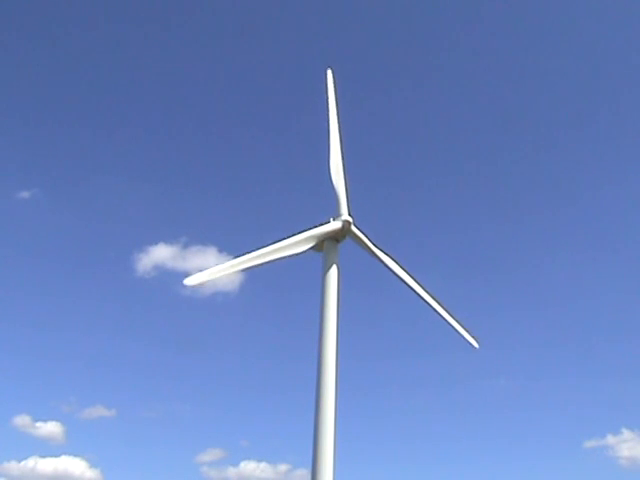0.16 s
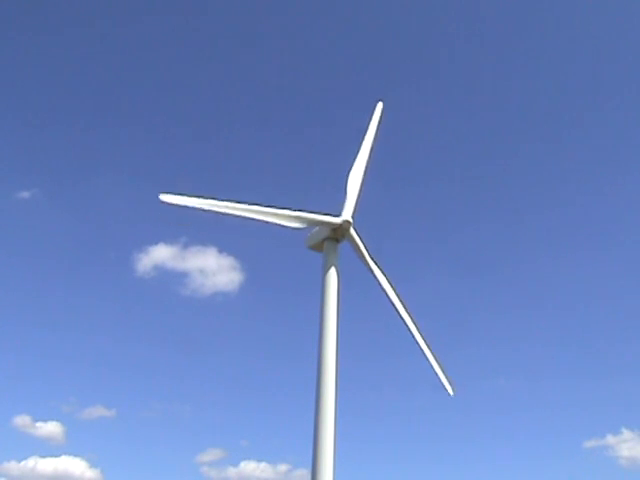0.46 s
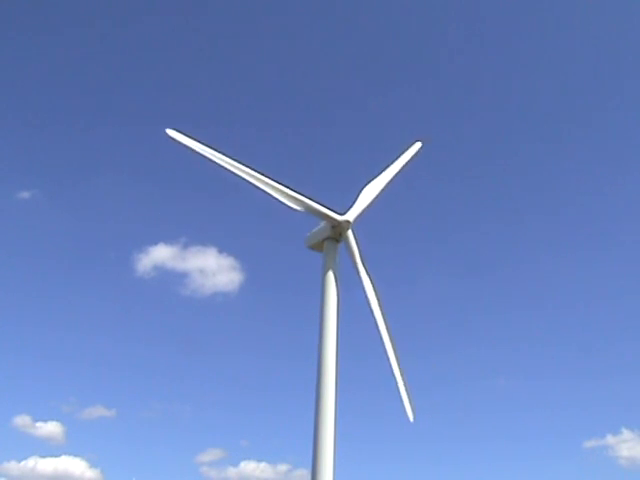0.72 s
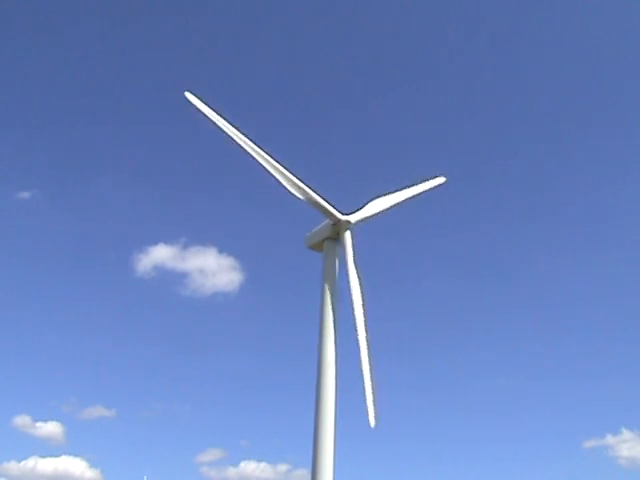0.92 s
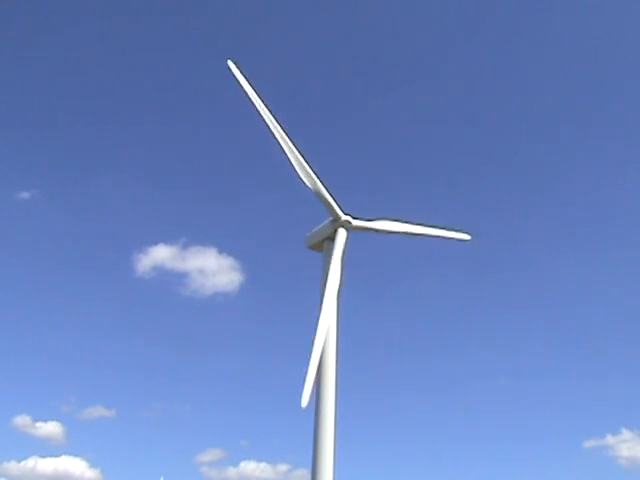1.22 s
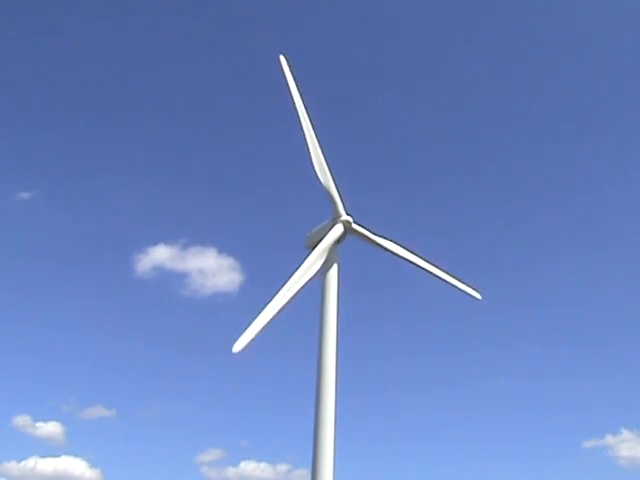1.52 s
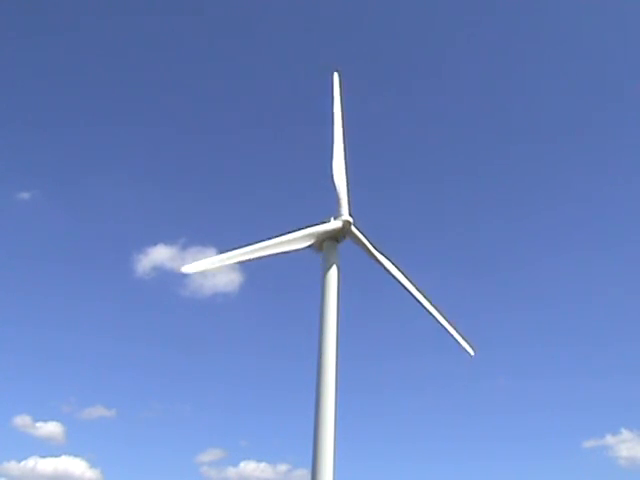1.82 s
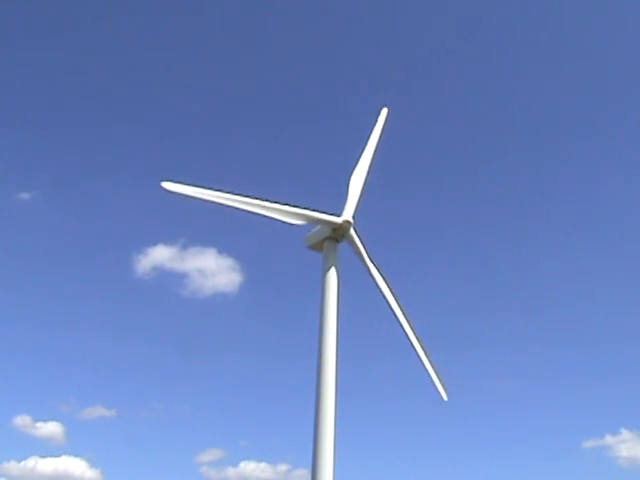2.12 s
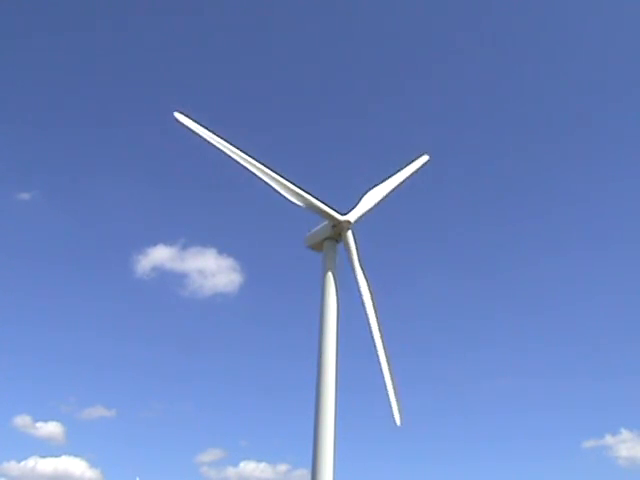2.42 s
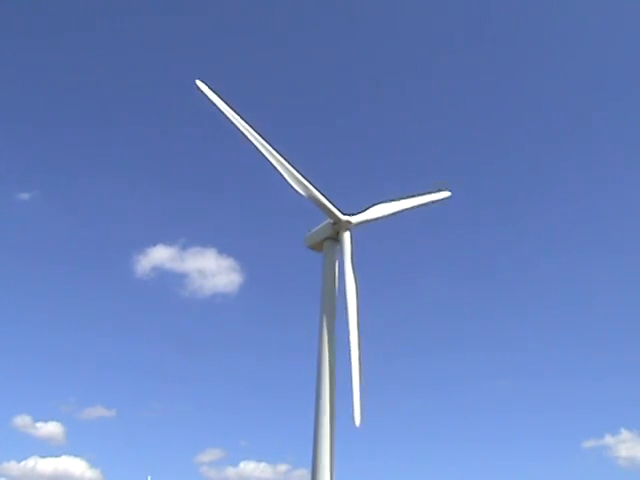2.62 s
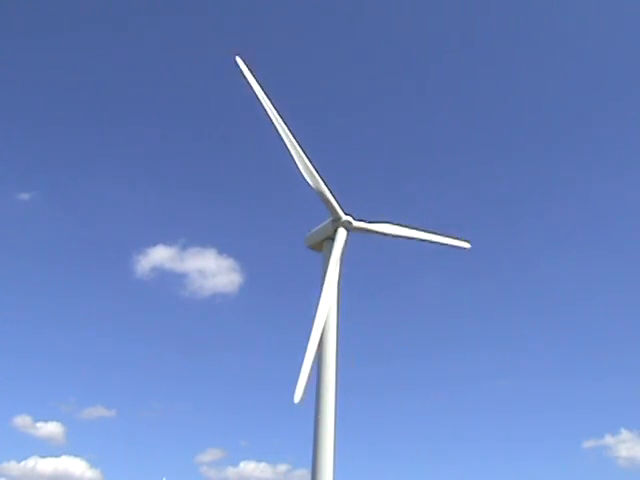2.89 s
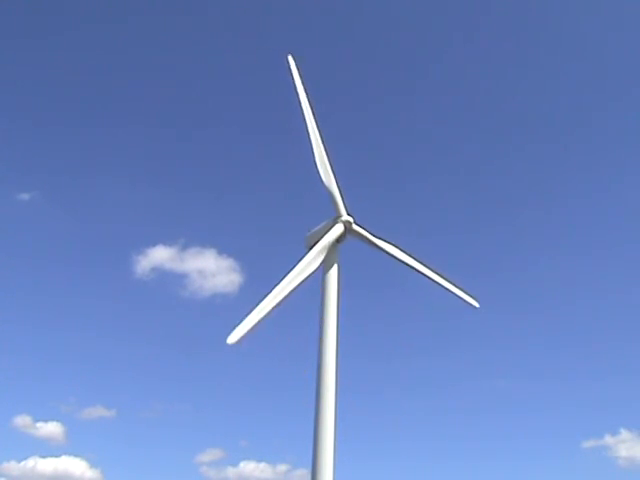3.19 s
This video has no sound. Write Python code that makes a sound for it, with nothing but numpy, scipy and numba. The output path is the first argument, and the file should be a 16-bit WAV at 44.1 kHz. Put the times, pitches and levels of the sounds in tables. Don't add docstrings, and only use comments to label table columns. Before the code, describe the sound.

Gusty low wind noise batters an open-air microphone, with sharp pops and distant birdsong.

```python
import sys
import numpy as np
from scipy import signal
from scipy.fft import rfft, irfft
from scipy.io import wavfile
from scipy.ndimage import uniform_filter1d
from numba import njit

SR = 44100
rng = np.random.default_rng(int(sys.argv[2]) if len(sys.argv) > 2 else 0)


def attenuation_scalar(level_db):
    decades = np.asarray(level_db, float) / 20
    return 10 ** decades


def unload_wav(signal):
    wavfile.write(
        sys.argv[1],
        SR,
        np.round(np.clip(np.atleast_2d(signal).T, -1, 1) * 32767).astype(np.int16),
    )


N = 147735
t = np.arange(N) / SR

# t/s, wind level/dB, turbulence/dB, cross-flow level/dB
GUSTS = [(0, -30, -16.5, 1.5), (.2, -36.5, -15, 2.5), (.7, -31, -16, 8), (.85, -32, -21.5, 8.5),
         (1.121, -37.5, -13, 4), (1.301, -27, -22, 5), (1.549, -26.5, -23, 6), (1.699, -30, -24, 6),
         (2.03, -28, -16, 6.5), (2.15, -25.5, -24, 6.5), (2.329, -30.5, -17.5, 1), (2.45, -26.5, -26, 4.5),
         (2.62, -34.5, -20, 10.5), (2.791, -22, -31.5, -4), (2.839, -18.5, -22.5, 12.5),
         (2.969, -29, -15, 1.5), (3.059, -26.5, -19, 4), (3.201, -27, -19.5, 5)]
# t/s, swell/dB, added turbulence/dB, length/s
WIND_PUFFS = [(0.146, -4.5, 10.5, 0.042), (0.477, 1, 2, 0.011), (0.57, -1, 6, .008), (0.698, 0.5, 6, .015),
              (0.898, 1, 6, .006), (1.057, -3, 11, 0.012), (1.12, -3, 2, 0.015), (1.301, 4, -3, .008),
              (1.405, 3, 5, 0.014), (1.526, 4.5, 1.5, 0.0067), (2.02, -3, 7, 0.029),
              (2.085, -3.5, 3, 0.017), (2.257, 0, 7, 0.019), (2.356, 4, 7, 0.029),
              (2.554, -1.5, 5.5, 0.0065), (2.616, -7, -2, 0.016), (2.672, 6.5, 0, 0.0083),
              (2.689, -6, 2, .008), (2.743, -6.5, 7, .015), (2.822, 2.5, 10, 0.0058),
              (2.96, -0.5, 9, 0.042), (3.044, 3, -6.5, 0.012), (3.148, -1.5, 10, .016),
              (3.192, -1.5, -8, 0.0063), (3.222, -2.5, 11, .005), (3.252, -4.5, 1, 0.016),
              (3.305, -0.5, 3, .008), (0.811, 2, 4, 0.0091), (1.921, 2, 3.5, 0.011), (2.311, .5, 5, 0.014),
              (2.462, 5, 1.5, 0.0093), (0.085, 2.5, -3.5, 0.019), (2.882, 0.5, 3.5, 0.0045)]
# t/s, pressure (+ is right, - is left), mono hold/s
EDDY_SLAPS = [(.3317, .62, .035), (.477, .35, .012), (1.2235, -.33, .025), (1.2931, -.42, .02),
              (1.5279, .5, .002), (1.6103, -.4, .03), (1.8194, .38, .025), (1.8688, -.52, .024),
              (2.1205, -.47, .022), (2.4499, -.44, .006), (2.6689, .3, .024), (2.7177, .8, .1),
              (2.826, -.66, .007), (3.025, -.5, .03), (3.0959, -.5, .016), (3.1694, .72, .041)]
# f/Hz, level/dB (per Hz)
RUMBLE_SPECTRUM = [(12, -31), (20, -6), (76, 1.5), (222, -4.5), (519, -22), (720, -29.5), (2000, -49),
                   (2600, -48.5), (4400, -120)]
# f/Hz, level/dB (per Hz)
CROSS_SPECTRUM = [(12, -28), (30, 10), (60, 10), (130, 9), (210, 5), (464, -9.5), (3000, -53), (5000, -60)]
# t/s, length/s, start f/Hz, end f/Hz, level/dB
LARK_NOTES = [(0, .02, 4100, 4100, -59), (.018, .035, 4100, 2500, -62), (.398, .022, 2750, 3000, -59),
              (.43, .025, 4000, 3450, -60), (.512, .018, 4200, 4100, -58), (.528, .025, 4100, 3100, -60),
              (.615, .045, 4300, 2600, -61), (.718, .012, 3600, 4200, -60), (.728, .03, 3900, 2600, -61),
              (.792, .05, 4650, 4950, -64), (.84, .025, 4900, 4200, -71), (1.135, .025, 3600, 2600, -61),
              (1.2, .016, 3500, 3600, -59), (1.79, .03, 4100, 3500, -61), (1.855, .035, 3800, 3200, -61),
              (1.9, .034, 4250, 4750, -57), (1.932, .04, 4300, 2700, -58), (1.957, .012, 3850, 4050, -60),
              (1.968, .022, 4000, 3200, -60), (2.055, .04, 4300, 3700, -64), (2.075, .022, 3800, 3100, -62),
              (2.172, .02, 3700, 3300, -60), (2.195, .022, 4100, 3500, -62), (2.345, .03, 4750, 4700, -66),
              (0, .03, 2250, 2150, -55), (.152, .036, 2250, 2150, -56), (.48, .065, 2850, 2450, -64),
               (1.13, .057, 2200, 2800, -58), (1.187, .028, 2700, 2200, -60),
               (1.215, .053, 2400, 3000, -58), (1.287, .045, 2350, 2250, -59),
               (1.627, .052, 3000, 2450, -55), (1.678, .025, 2600, 3450, -60), (1.85, .03, 2000, 2300, -61),
               (1.878, .028, 2400, 3400, -60), (2.03, .055, 3900, 2650, -59),
               (2.255, .065, 2900, 3080, -55), (2.313, .05, 3080, 2850, -55),
               (2.356, .058, 2850, 2250, -57), (2.478, .025, 3000, 2900, -57), (2.5, .02, 2900, 2450, -56),
               (2.865, .17, 2850, 2700, -64), (3.06, .05, 4650, 5000, -63), (3.108, .025, 5000, 4100, -61),
               (3.18, .045, 5100, 3200, -64), (3.26, .045, 4200, 2700, -64), (3.328, .03, 4350, 4300, -59),
               (.905, .02, 3650, 3550, -60), (.03, .06, 4800, 4650, -68), (.755, .015, 5000, 4200, -65),
               (1.215, .025, 6200, 5300, -64), (1.345, .02, 5900, 5500, -66), (.995, .025, 3900, 3100, -62),
               (.94, .02, 4800, 4300, -64), (3.3, .015, 5200, 5000, -62)]
# t/s, level/dB, centre f/Hz, width/octaves
NEAR_CLICKS = [
    (.134, -35, 2400, .85),
    (.621, -43, 11000, 1.0),
    (.6684, -35, 10000, 1.2),
    (2.7181, -19, 800, 1.4),
]
# f/Hz, level/dB, wander/Hz
GEAR_MESH = [
    (512, -57, 9),
    (1024, -66.5, 8),
]
# f/Hz, level/dB (per Hz)
HISS_SPECTRUM = [(600, -20), (1000, 0), (2000, -6), (3500, -10), (5500, -14), (8800, -20), (11000, -18),
                 (15500, -22)]
# f/Hz, level/dB
CIRCUIT_LINES = [(4500, -88), (5265, -88), (5922, -88), (10158, -91), (11186, -90), (15735, -96)]


def unit(x):
    return x / np.sqrt(np.mean(x ** 2))


def colour(x, points):
    hz, db = np.array(points, float).T
    f = np.fft.rfftfreq(N, 1 / SR) + 1
    return irfft(rfft(x) * attenuation_scalar(np.interp(np.log(f), np.log(hz), db)), N)


def band(x, hz, octaves):
    f = np.fft.rfftfreq(N, 1 / SR) + 1
    return irfft(rfft(x) * np.exp(-(np.log2(f / hz) / octaves) ** 2), N)


def walk(rate_hz):
    z = np.interp(t * rate_hz, np.arange(400), rng.standard_normal(400))
    z = uniform_filter1d(z, int(SR / rate_hz))
    return unit(z - z.mean())


def gust(column):
    g = np.array(GUSTS)
    return np.interp(t, g[:, 0], g[:, column])


def puffs(column):
    return sum(p[column] * np.exp(-.5 * ((t - p[0]) / p[3]) ** 2) for p in WIND_PUFFS)


def eddy_grains():
    eddies_per_s, scatter_db, most_db = 160, 6, 11
    draw = rng.random((2000, 2))
    at = (np.cumsum(-np.log(draw[:, 0])) * SR / eddies_per_s).astype(int)
    size_db = np.minimum(-scatter_db * np.log(draw[:, 1]), most_db)
    size = attenuation_scalar(size_db) * np.sign(rng.standard_normal(2000))
    grains = np.zeros(N)
    inside = at < N
    grains[at[inside]] = size[inside]
    return unit(grains)


def flow(spectrum, spit_db, shared_db, own_db, grain):
    puff_hz, puff_octaves = 108, 2.1
    raw = colour(rng.standard_normal(N) + grain * eddy_grains(), spectrum)
    shared = walk(24.98)
    turbulence_db, puff_db = gust(column=2) + spit_db, puffs(column=2)
    out = np.zeros(N)
    for hz in 25 * 2. ** np.arange(8):
        top = np.clip(np.log2(hz / 90) / 3.86, 0, 1)
        lift = np.clip(np.log2(hz / puff_hz) / puff_octaves, -.4, 1)
        swell_db = shared_db * (.36 + top) * shared + own_db * walk(8.474)
        out += attenuation_scalar(swell_db + top * turbulence_db + lift * puff_db) * band(raw, hz, 1.0)
    return unit(out) * attenuation_scalar(gust(column=1) + puffs(column=1))


def rumble():
    return flow(RUMBLE_SPECTRUM, spit_db=19, shared_db=1.5, own_db=2.5, grain=.68)


def cross_flow():
    port_cut_hz, ceiling = 105, .4
    cross = flow(CROSS_SPECTRUM, spit_db=25.5, shared_db=-3, own_db=-4, grain=1.16)
    cross = cross * attenuation_scalar(-1 + gust(column=3))
    cross = signal.sosfilt(signal.butter(2, port_cut_hz, "high", fs=SR, output="sos"), cross)
    return ceiling * np.tanh(cross / ceiling)


def slaps():
    push_s, dip_s, dip_share = .0006, .003, .13
    fold_db, fold_s, unfold_s = -29.5, .0015, .00088
    push, fold = np.zeros(N), np.zeros(N)
    for at, size, hold in EDDY_SLAPS:
        u = t - at
        dip = np.exp(-((u + 1.76 * dip_s) / dip_s) ** 2)
        push += size * (np.exp(-.5 * (u / push_s) ** 2) - dip_share * dip)
        closing = np.minimum(u / fold_s, (hold - u) / unfold_s)
        fold = np.maximum(fold, np.clip(closing, 0, 1))
    return attenuation_scalar(-3) * push, attenuation_scalar(fold_db * fold)


def larks():
    soft_end_s, smear_s, smear_db = .005, .03, -8
    song, wobble_hz = np.zeros(N), 25 * walk(150)
    for start, length, hz0, hz1, db in LARK_NOTES:
        u = np.clip((t - start) / length, 0, 1)
        shape = np.clip(np.minimum(u, 1 - u) * length / soft_end_s, 0, 1)
        pitch_hz = hz0 + (hz1 - hz0) * u + wobble_hz
        song += attenuation_scalar(db) * shape * np.sin(2 * np.pi * np.cumsum(pitch_hz) / SR)
    song = np.sqrt(2) * song * attenuation_scalar(-4 + 2.3 * walk(90))
    scatter = rng.standard_normal(4000) * np.exp(-t[:4000] / smear_s)
    scatter = scatter / np.sqrt(np.sum(scatter ** 2))
    return song + attenuation_scalar(smear_db) * signal.fftconvolve(song, scatter)[:N]


def near_clicks():
    out = np.zeros(N)
    for at, db, hz, octaves in NEAR_CLICKS:
        click = np.zeros(N)
        click[int(at * SR)] = 1
        burst = band(click, hz, octaves)
        out -= attenuation_scalar(db) * burst / np.abs(burst).max()
    return out


def gearbox():
    out = np.zeros(N)
    for hz, db, wander_hz in GEAR_MESH:
        phase = 2 * np.pi * np.cumsum(hz + wander_hz * walk(25)) / SR
        out += attenuation_scalar(db + 3 * walk(20)) * np.sin(phase)
    return np.sqrt(2) * out


def field_hiss():
    return unit(colour(rng.standard_normal(N), HISS_SPECTRUM)) * attenuation_scalar(-62 + .8 * walk(8))


def electronics():
    return np.sqrt(2) * sum(attenuation_scalar(db) * np.sin(2 * np.pi * hz * t) for hz, db in CIRCUIT_LINES)


def scene():
    near_side_db, hiss_side_db, width_db = -7.5, -4, -2.2
    push, fold = slaps()
    wind = rumble()
    near = larks() + near_clicks()
    mid = wind + .08 * push + near + gearbox() + field_hiss() + electronics()
    lean = .85 * band(wind, 50, 1.1)
    side = cross_flow() + lean - attenuation_scalar(near_side_db) * near + attenuation_scalar(hiss_side_db) * field_hiss()
    side = attenuation_scalar(width_db) * (fold * side + push)
    return np.array([mid - side, mid + side])


@njit
def follow(x, release):
    e, y = 0., np.empty(len(x))
    for i in range(len(x)):
        e = max(x[i], e * release)
        y[i] = e
    return y


def low_pass(x):
    return signal.sosfilt(signal.butter(12, 16300, fs=SR, output="sos"), x)


def record(dry):
    threshold_db, ratio, release_s = -32.5, 4.15, .062
    gain_db, ceiling, top_hz = 10, .99, 15850
    loud = np.roll(uniform_filter1d(np.abs(dry.mean(axis=0)), 500), 300)
    envelope = follow(loud, np.exp(-1 / (release_s * SR)))
    over = np.maximum(envelope / attenuation_scalar(threshold_db), 1)
    ducked = dry * over ** (1 / ratio - 1)
    mix = np.clip(ducked * attenuation_scalar(gain_db), -ceiling, ceiling)
    mix = signal.sosfilt(signal.ellip(8, .2, 60, top_hz, fs=SR, output="sos"), mix)
    return low_pass(mix)


dry = scene()
out = record(dry)
unload_wav(out)
```